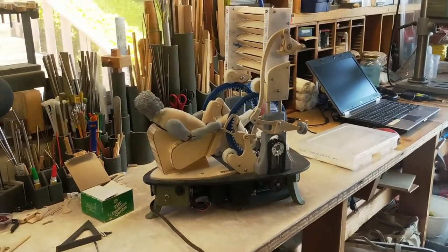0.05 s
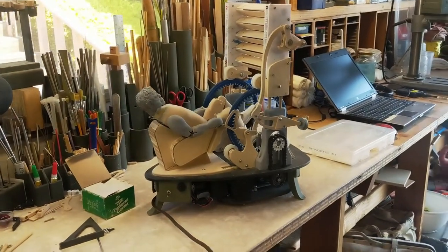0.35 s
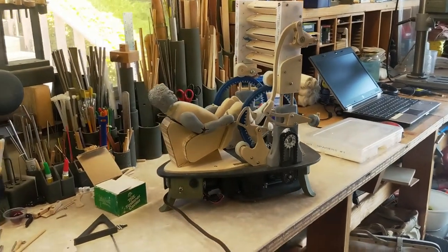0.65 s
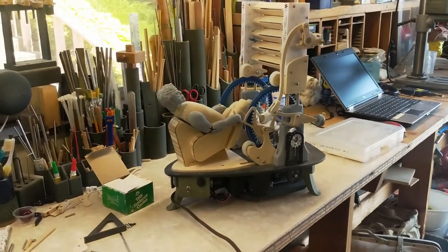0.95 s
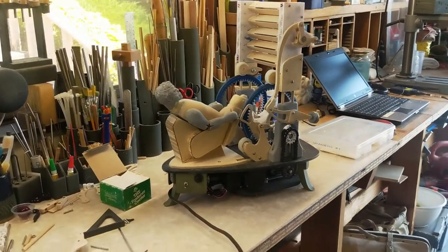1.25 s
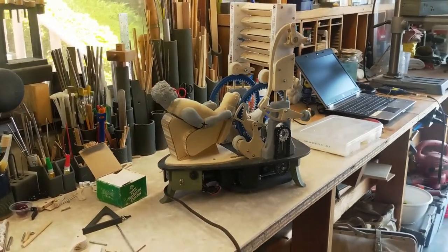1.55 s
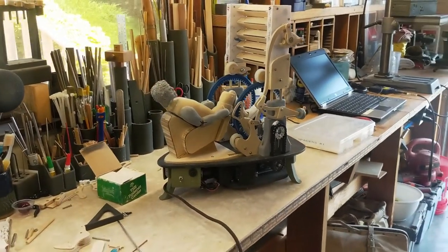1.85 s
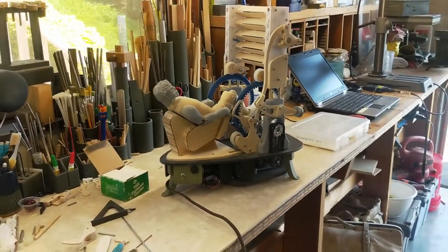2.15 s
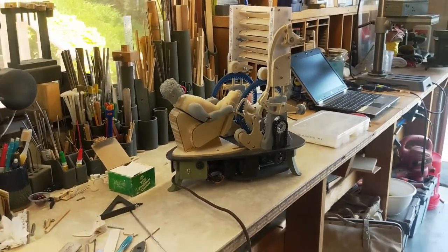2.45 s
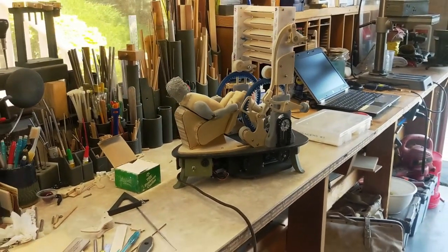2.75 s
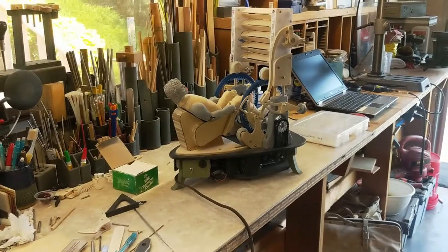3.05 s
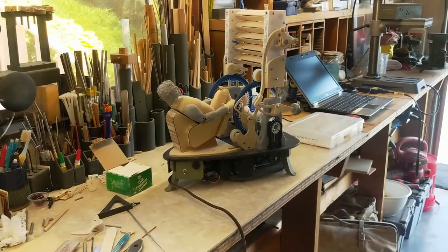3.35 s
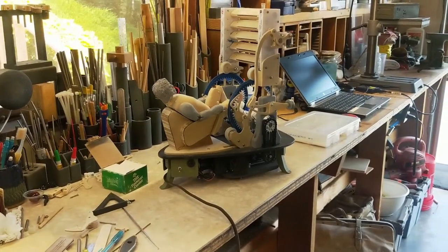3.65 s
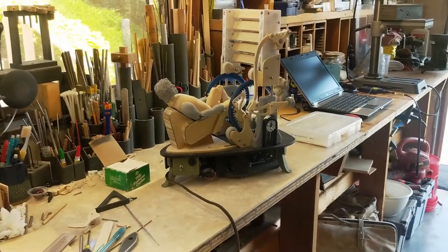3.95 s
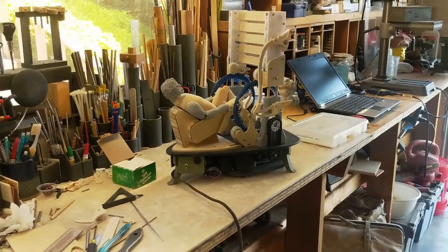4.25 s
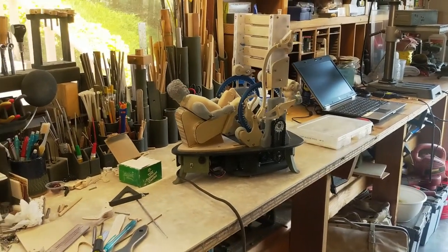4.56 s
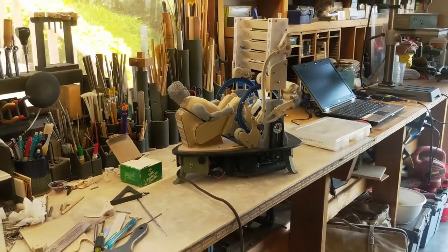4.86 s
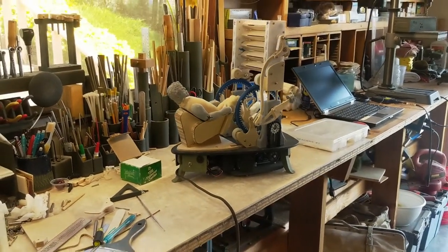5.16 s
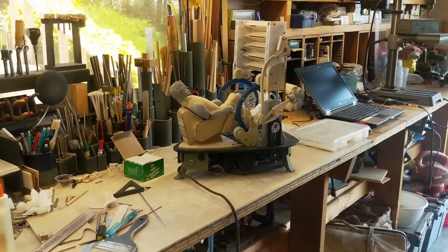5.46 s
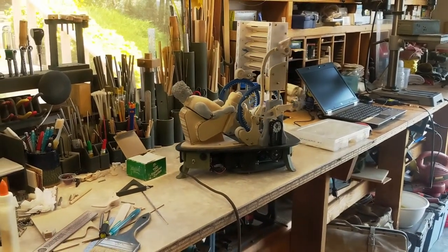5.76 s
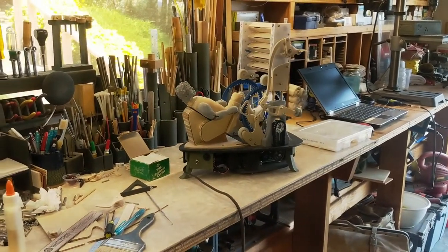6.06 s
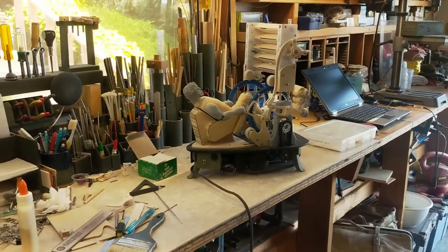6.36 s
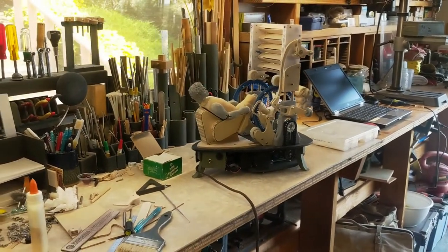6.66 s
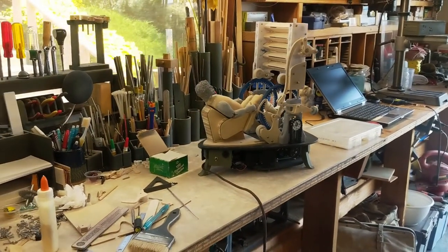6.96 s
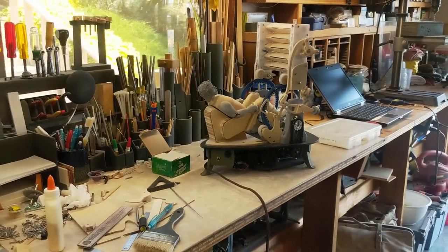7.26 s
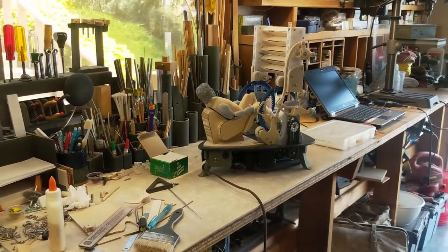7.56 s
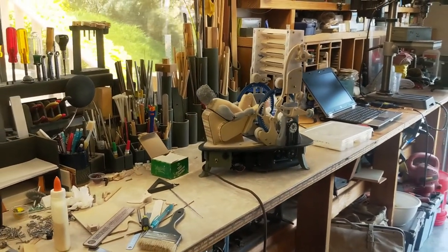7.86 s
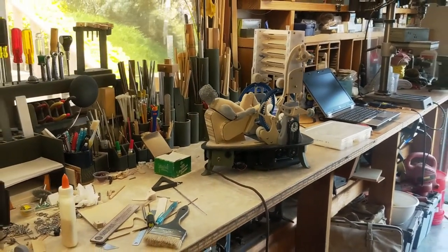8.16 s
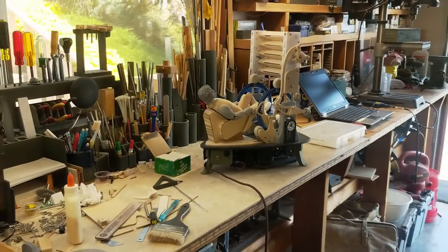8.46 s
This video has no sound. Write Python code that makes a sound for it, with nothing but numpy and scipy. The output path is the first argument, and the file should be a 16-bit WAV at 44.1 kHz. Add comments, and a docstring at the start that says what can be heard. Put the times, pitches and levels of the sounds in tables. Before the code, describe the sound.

Soft ticks once a second over a low motor hum, broken by a sharp wooden clack and a little ball bouncing.

```python
"""A wooden automaton runs on a workshop bench: its motor hums, a clock movement ticks once a second,
a bird buzzes outside. The whole sound sinks over the first 4.5 s. From 5.1 s wooden parts rub.
At 5.9 s the slats flip over with a clack that shakes the frame, and the full level comes back.
A small hard ball drops and bounces to rest, each bounce softer and duller.
Low drones swell and the bird whistles near the end."""
import sys
import numpy as np
from scipy import signal
from scipy.fft import rfft, irfft, next_fast_len
from scipy.io import wavfile

SR = 44100
rng = np.random.default_rng(int(sys.argv[2]) if len(sys.argv) > 2 else 0)


def persist_wave(psi):
    """Save psi, clipped to +-1, as 16-bit WAV."""
    counts = np.round(np.clip(psi, -1, 1) * 32767).astype(np.int16)
    wavfile.write(sys.argv[1], SR, np.atleast_2d(counts).T)


N = 379701
TIME = np.arange(N) / SR
AGE = np.arange(int(.7 * SR)) / SR  # s since an event's onset


def slats(flip_s=5.9414, flip_db=-20, count=5, gap_s=.0055, crack_t60_s=0.017, rise_s=0.0022):
    """Slats land in turn, each softer, and rebound once; the first blow shakes frame and bench."""
    # frame and bench modes: pitch_hz, level_db, t60_s
    frame_modes = [(63, -14, 0.28), (257, -12.5, 0.1), (405, -15, 0.089), (516, -17, 0.12),
                   (640, -12, 0.075), (737, -8, 0.074), (1506, -16, 0.089), (6890, -15, .1),
                   (7200, -15, .1)]
    follower_db, fall_db_per_slat, frame_db = -3, 2.7, -23
    rebound_s, rebound_db = .118, -30
    out = np.zeros(N)
    for delay_s, first_db in [(0, flip_db), (rebound_s, flip_db + rebound_db)]:
        for k in range(count):
            db = first_db + follower_db * (k > 0) - fall_db_per_slat * k
            envelope = from_db(db - 60 * AGE / crack_t60_s) * attack(rise_s)
            add(out, flip_s + delay_s + k * gap_s, envelope * wood_noise())
    out = room(out, wet_db=-4.5)
    add(out, flip_s, from_db(frame_db) * ring(frame_modes) * attack(rise_s=0.0094))
    return out


def ball(click_t60_s=0.035, rise_s=0.0028, echo_s=.0032, echo_db=0.5, ring_db=-2.5):
    """Each bounce: a click, its echo off the bench, a ring. Slower bounces touch longer, sound duller."""
    # bounces: start_s, level_db
    bounces = [(6.0903, -22), (6.2317, -28.5), (6.3406, -33), (6.4146, -38.5), (6.461, -45)]
    # contact click spectrum: freq_hz, density_db
    click_spectrum = [(300, -16), (720, 0), (980, -5), (1330, 3.5), (1750, -7.5), (2450, 4.5), (3400, -7),
                      (4050, -3.5), (4650, -16), (5550, 7.5), (6700, -6), (7750, 0.5), (9300, 0),
                      (11800, -1), (13800, -10), (15500, -6)]
    # modes the ball excites: pitch_hz, level_db, t60_s
    modes = [(1284, -8, 0.047), (1387, -6.5, 0.041), (2540, -31, 0.17), (2680, -24, 0.15),
             (2870, -20, 0.13), (3060, -33, 0.19), (4026, -25, 0.15), (5475, -8, 0.093),
             (5565, -17.5, 0.29), (5660, -23, 0.24), (7540, -18, 0.2), (7784, -20, .26), (9200, -17, 0.18),
             (9300, -17, 0.15), (9700, -25, .14), (10933, -28, .16), (11380, -16, 0.14)]
    first_cutoff_hz, dulling_exponent = 15800, .55
    out = np.zeros(N)
    tone = from_db(ring_db) * ring(modes) * attack(rise_s)
    envelope = from_db(-60 * AGE / click_t60_s) * attack(rise_s)
    for number, (start_s, db) in enumerate(bounces, 1):
        click = envelope * noise(click_spectrum, len(AGE))
        add(click, echo_s, from_db(echo_db) * envelope * noise(click_spectrum, len(AGE)))
        lowpass = signal.butter(4, first_cutoff_hz / number ** dulling_exponent, fs=SR, output="sos")
        add(out, start_s, from_db(db) * signal.sosfilt(lowpass, room(click, wet_db=-3) + tone))
    return out


def slides(grain_db=3, slope_db_per_octave=9, body_db=-3, body_db_per_octave=4):
    """Wood rubs on wood in short grainy swells; the frame carries the lows."""
    # rubs: start_s, level_db, length_s, peak_hz
    rubs = [(5.125, -53, 0.034, 6000), (5.153, -40.5, 0.062, 3030), (5.185, -43, .1, 130),
            (5.473, -53, .022, 6000), (5.872, -47, 0.11, 7000), (5.893, -39.5, .04, 1160)]
    out = np.zeros(N)
    for start_s, db, length_s, peak_hz in rubs:
        peak = lambda hz: -slope_db_per_octave * abs(np.log2((hz + 1) / peak_hz))
        body = lambda hz: body_db - body_db_per_octave * np.log2(hz / 100 + 1)
        rub = filtered(wood_noise(), lambda hz: np.maximum(peak(hz), body(hz)))
        swell = np.sin(np.pi * np.minimum(AGE / length_s, 1))
        add(out, start_s, from_db(db) * unit(rub) * swell)
    grain = from_db(grain_db * drift(rate_hz=150))
    return room(out * grain / np.sqrt(2), wet_db=-3.5)


def wood_noise():
    """Noise coloured by the slat wood, for one blow or rub."""
    # slat wood spectrum: freq_hz, density_db
    wood_spectrum = [(30, -16), (100, -3), (260, 8.5), (370, 0), (520, -1), (680, 6.5), (860, -7),
                     (1100, 1), (1450, 2), (1900, -4), (2700, -2.5), (3600, -1.5), (5800, -4.5),
                     (7200, -0.5), (8300, -10), (11000, -15), (16000, -21)]
    return noise(wood_spectrum, len(AGE))


def clock(first_step_s=.0298, step_s=1.0, contact_t60_s=0.041, gap_s=.0065, scatter_db=3.0):
    """Each step throws the gears together: a first contact, then a short rattle in the case."""
    # short tick, longer tock: initial_db, fall_db_per_s, rattle_s, first_contact_over_rattle_db
    strokes = [(-45, .95, 0.02, -0.5), (-50.5, 0.15, .054, 9)]
    # clock case spectrum: freq_hz, density_db
    case_spectrum = [(350, -6), (640, 6.5), (950, -2), (1400, -9), (1900, -4), (2450, -1), (3200, -12.5),
                     (4000, -6), (4600, -8.5), (6000, -4), (6900, 2), (7700, -2.5), (8300, -14.5),
                     (11000, -15.5), (16000, -25)]
    out = np.zeros(N)
    for step, start_s in enumerate(np.arange(first_step_s, N / SR, step_s)):
        db, fall_db_per_s, rattle_s, first_db = strokes[step % 2]
        slip, strength = rng.standard_normal((2, 16))
        power = from_db(first_db - 60 * AGE / contact_t60_s) ** 2
        for k in range(1, 16):
            delay_s = gap_s * (k + 0.34 * slip[k])
            gate = np.clip((rattle_s - k * gap_s) / gap_s + 1, 0, 1) * (AGE > delay_s)
            contact = from_db(scatter_db * strength[k] - 60 * abs(AGE - delay_s) / contact_t60_s)
            power += gate * contact ** 2
        envelope = from_db(db - fall_db_per_s * start_s) * np.sqrt(power) * attack(rise_s=0.0016)
        add(out, start_s, envelope * noise(case_spectrum, len(AGE)))
    return room(out, wet_db=1.5)


def motor(shaft_hz=143.6, waver=0.00614, throb_db=2.0, mains_hz=120.2, mains_db=-66):
    """Shaft harmonics swell with the load, over mains hum and passing drones."""
    # hum level under changing load: time_s, level_db
    load_curve = [(0.0, -55), (1.5, -55), (1.9, -49.0), (2.7, -47), (3.25, -42), (3.7, -48.5),
                  (4.35, -46.5), (4.8, -62), (5.4, -54), (5.9, -71)]
    # hum partials: shaft_multiple, level_db
    partials = [(1, -13), (2, -1), (3, -21), (5, -23)]
    # drones of drive and bench: start_s, end_s, pitch_hz, level_db
    drones = [(.1, 1.362, 91.6, -53.5), (6.5, 8.9, 91.3, -62), (6.9, 8.9, 183, -62.5),
              (7.4, 7.9, 322.3, -56.5), (8.1, 8.9, 694, -63)]
    turns = np.cumsum(shaft_hz * (1 + waver * drift(rate_hz=8.1))) / SR
    load = from_db(np.interp(TIME, *np.transpose(load_curve)))
    out = from_db(mains_db) * np.sin(2 * np.pi * mains_hz * TIME)
    for multiple, db in partials:
        gain = load * from_db(db + throb_db * drift(rate_hz=40))
        out += gain * np.sin(2 * np.pi * (multiple * turns + rng.random()))
    for start_s, end_s, hz, db in drones:
        gate = np.clip(np.minimum(TIME - start_s, end_s - TIME) / 0.28, 0, 1)
        gain = gate * from_db(db - throb_db * drift(rate_hz=3.5))
        out += gain * np.sin(2 * np.pi * hz * TIME + 0.2 * drift(rate_hz=3.7))
    return np.sqrt(2) * out


def bird(buzz_db=-66.5):
    """Thin buzzes and gliding whistles, far off and reverberant."""
    # buzzes: start_s, length_s, pitch_hz
    buzzes = [(.36, .18, 6200), (.65, 0.092, 4350), (1.735, 0.3, 6130), (4.564, .42, 6100),
              (6.578, 0.15, 4350), (7.52, .35, 6230)]
    # whistles: start_s, length_s, first_hz, last_hz, level_db
    whistles = [(7.838, .1, 6040, 4600, -59), (7.989, .14, 4150, 3970, -60), (8.303, .045, 3580, 4080, -60),
                (8.486, .045, 3500, 3950, -63)]
    out = np.zeros(N)
    for start_s, length_s, hz in buzzes:
        add(out, start_s, from_db(buzz_db) * bird_note(length_s, hz, hz, waver=.035))
    for start_s, length_s, first_hz, last_hz, db in whistles:
        add(out, start_s, from_db(db) * bird_note(length_s, first_hz, last_hz, waver=.011))
    return room(out, wet_db=-3.0)


def bird_note(length_s, first_hz, last_hz, waver, warble_depth=.02, warble_hz=15):
    """A sine eases between two pitches, with a slow warble and a fast random waver."""
    t = np.arange(0, length_s, 1 / SR)
    glide_hz = first_hz + (last_hz - first_hz) * np.sin(np.pi / 2 * t / length_s) ** 2
    warble = warble_depth * np.sin(2 * np.pi * warble_hz * t)
    hz = glide_hz * (1 + warble + waver * drift(rate_hz=116)[:len(t)])
    envelope = np.sqrt(abs(np.sin(np.pi * t / length_s)))
    return envelope * np.sin(2 * np.pi * np.cumsum(hz) / SR)


def air(level_db=-49, heave_db=0.2, rumble_hz=700):
    """Low shop rumble that heaves a little, with a faint even hiss."""
    # workshop air spectrum: freq_hz, density_db
    air_spectrum = [(25, -26), (40, -11.5), (55, 0.5), (88, 2.5), (125, -4.5), (190, -6.5), (290, -4.5),
                    (420, -11), (560, -10), (700, -9.5), (1000, -14.5), (2200, -21), (7600, -27),
                    (8500, -31), (15500, -30.5)]
    wash = from_db(level_db) * noise(air_spectrum, N)
    rumble = filtered(wash, lambda hz: -10 * np.log10(1 + (hz / rumble_hz) ** 2))
    return wash + rumble * (from_db(heave_db * drift(rate_hz=18)) - 1)


def room(x, wet_db):
    """Adds dense reflections from the cluttered shop; the treble dies first."""
    # workshop reverberation: freq_hz, t60_s
    decay_times = [(100, .3), (1000, 0.3), (3000, 0.32), (7000, 0.3), (11000, 0.24), (16000, 0.12)]
    hz, t, spectrogram = signal.stft(rng.standard_normal(len(AGE)), SR, nperseg=256)
    decay = from_db(-60 * t / read(decay_times, hz)[:, None])
    tail = signal.istft(spectrogram * decay, SR, nperseg=256)[1][:len(AGE)]
    tail *= attack(rise_s=0.0012)
    return x + from_db(wet_db) * signal.fftconvolve(x, tail / np.linalg.norm(tail))[:len(x)]


def fade(start_db=-5.5, sunk_db=-19.5, sink_s=4.53, return_s=5.938, jump_s=0.0075):
    """Overall gain: sinks smoothly, jumps back with the clack, overshoots, then sags."""
    return_db, overshoot_db, settle_s, sag_db_per_s = 1.5, 3.8, 0.24, 1.14
    sink_db = start_db + (sunk_db - start_db) * np.sin(np.pi / 2 * np.minimum(TIME / sink_s, 1)) ** 2
    since_s = np.maximum(TIME - return_s, 0)
    back_db = return_db + overshoot_db * np.exp(-since_s / settle_s) - sag_db_per_s * since_s
    return from_db(sink_db + (back_db - sink_db) * np.minimum(since_s / jump_s, 1))


def from_db(db):
    """Decibels to gain."""
    return 10 ** (np.asarray(db) / 20)


def unit(x):
    """Scales to rms 1."""
    return x / np.sqrt(np.mean(x ** 2) + 1e-20)


def read(points, hz):
    """Interpolates a table on a log-frequency axis."""
    freq_hz, value = np.transpose(points)
    return np.interp(np.log(hz + 1), np.log(freq_hz + 1), value)


def add(mix, start_s, sound):
    """Mixes a sound in at start_s."""
    part = mix[max(round(start_s * SR), 0):][:len(sound)]
    part += sound[:len(part)]


def attack(rise_s):
    """Linear onset ramp, 0 to 1."""
    return np.clip(AGE / rise_s, 0, 1)


def filtered(x, db_at):
    """Filters by the gain curve db_at(hz)."""
    return irfft(rfft(x) * from_db(db_at(np.fft.rfftfreq(len(x), 1 / SR))), len(x))


def noise(spectrum, size):
    """Noise of rms 1 with the given spectral shape."""
    white = rng.standard_normal(next_fast_len(size))
    return unit(filtered(white, lambda hz: read(spectrum, hz)))[:size]


def drift(rate_hz):
    """Smooth random wander of rms 1."""
    hop = 88
    slow = filtered(rng.standard_normal(N // hop + 2), lambda hz: -6 * (hz / hop / rate_hz) ** 2)
    return np.interp(np.arange(N) / hop, np.arange(len(slow)), unit(slow))


def ring(modes):
    """Decaying sines of one blow, random in polarity."""
    return sum(from_db(db - 60 * AGE / t60_s) * np.sin(2 * np.pi * hz * AGE) * rng.choice([-1, 1])
               for hz, db, t60_s in modes)


def scene():
    """All sources, mono."""
    return (air() + motor() + clock() + slides() + slats() + ball() + bird())[None]


def record(dry):
    """The slow fade and its sudden return, then the band limit."""
    edge_hz = 15850
    lowpass = signal.firwin(511, edge_hz, window=("kaiser", 9), fs=SR)
    return signal.oaconvolve(dry * fade(), lowpass[None], "same")


dry = scene()
out = record(dry)
persist_wave(out)
```